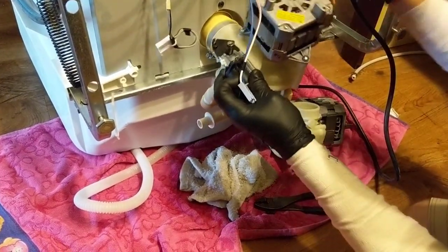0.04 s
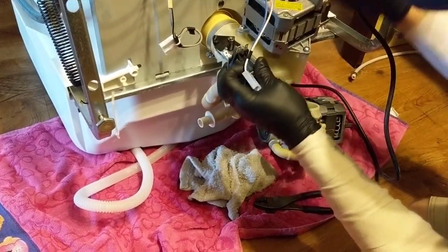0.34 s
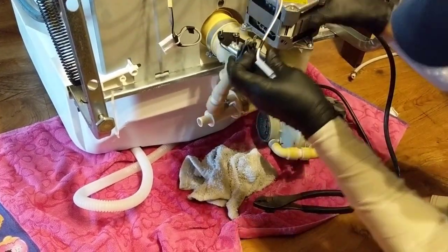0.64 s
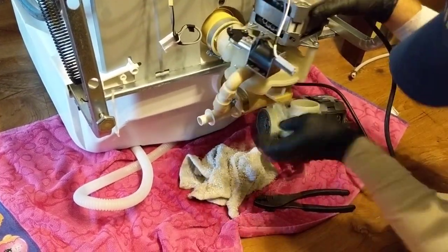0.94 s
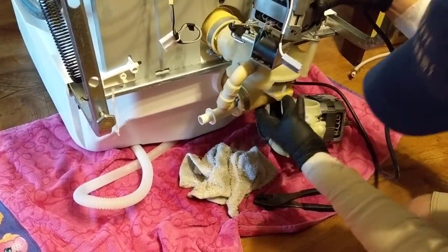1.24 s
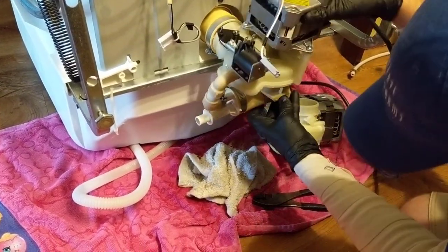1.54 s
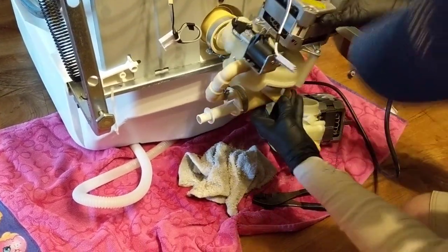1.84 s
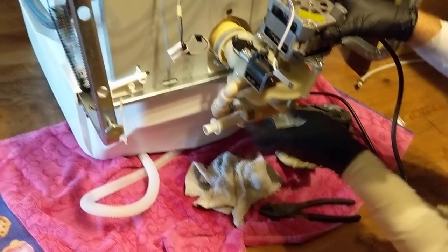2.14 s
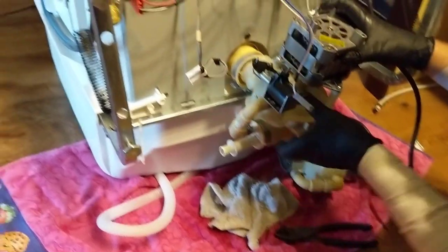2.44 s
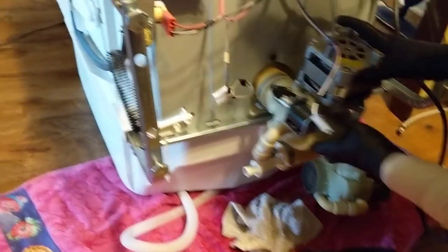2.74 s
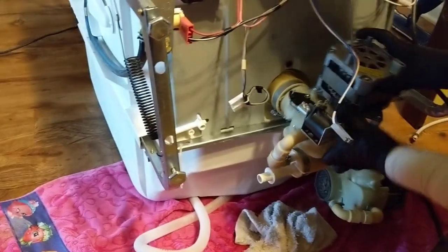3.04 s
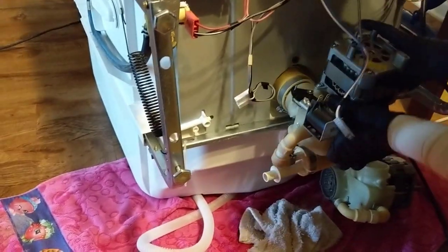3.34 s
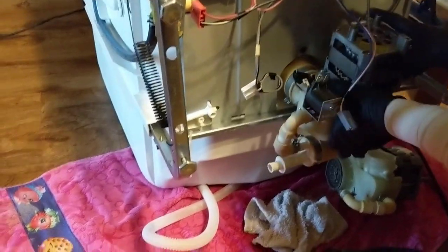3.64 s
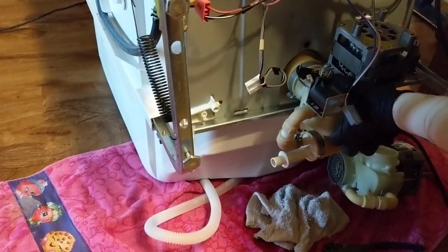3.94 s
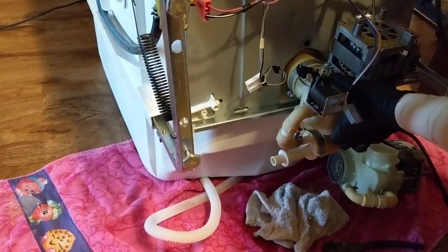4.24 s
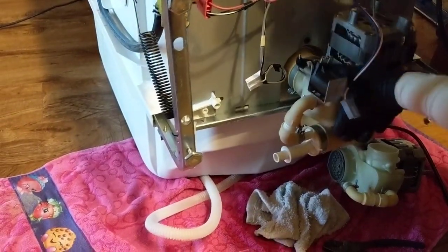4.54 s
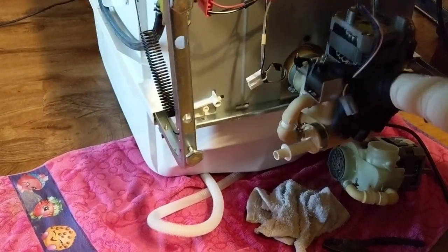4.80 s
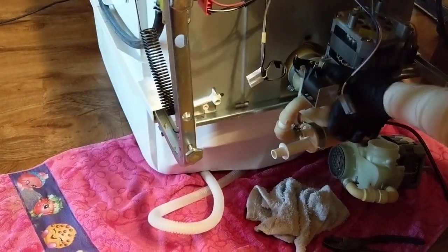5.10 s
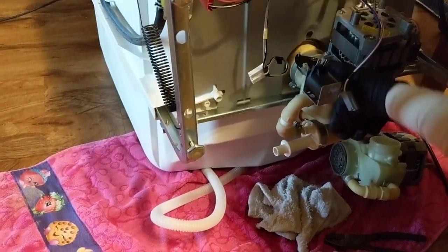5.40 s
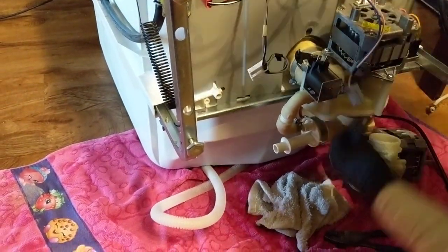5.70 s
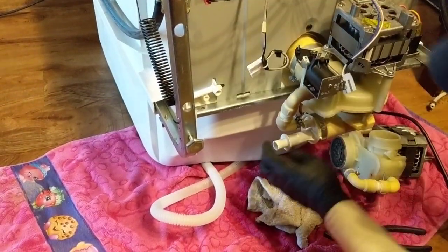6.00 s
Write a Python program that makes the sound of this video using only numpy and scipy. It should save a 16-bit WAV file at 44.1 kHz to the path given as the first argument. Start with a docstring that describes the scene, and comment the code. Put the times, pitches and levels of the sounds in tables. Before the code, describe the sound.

In a small room with a low, steady hum, quick plastic clicks and hollow thumps come from a pump and motor being handled close to the microphone. Gloves and plastic scrape softly. Around the middle the parts bang hard against a steel dishwasher tub, which rings briefly. About a second later they clatter against it twice more, before the handling thins to a few light knocks and clicks.

```python
"""A pump housing knocks in its seat as gloved hands work the pump and motor into a dishwasher's steel tub.
The heavy motor thumps, the hollow housing rings, and plastic fittings click as they meet. Three hard
jolts make the tub ring. Gloves and plastic rub, and a rubber seal groans. Behind it all is the low
mains hum of a small room. One nearby microphone with a limiter picks it up."""
import sys
import numpy as np
from scipy import signal
from scipy.fft import rfft, irfft, next_fast_len
from scipy.io import wavfile
from scipy.ndimage import uniform_filter1d, minimum_filter1d, map_coordinates

SR = 44100
rng = np.random.default_rng(int(sys.argv[2]) if len(sys.argv) > 2 else 0)


def file_out(sig):
    """Save sig as 16-bit WAV at sys.argv[1]."""
    # one column per channel
    cols = np.atleast_2d(sig).T
    # limit, then scale
    lim = np.clip(cols, -1, 1)
    pcm = np.round(lim * 32767).astype(np.int16)
    wavfile.write(sys.argv[1], SR, pcm)


N = 276066

# A fade time (t60) is how long a sound takes to drop by 60 dB. A mode is one note a part rings at.
# The housing bumps its seat:
# (time [s], thump level [dB], knock level [dB], ring length [factor], pitch of the struck spot [Hz])
KNOCKS = [(0.048, -25, -30, 0.85, 603), (0.117, -43, -30, .3, 680), (0.633, -14.5, -19, 0.24, 780),
          (0.708, -12.5, -23.5, 1.08, 497), (0.827, -24.5, -31, 0.82, 616), (1.191, -33, -64, 1.05, 500),
          (1.412, -26, -51, 1.2, 450), (1.432, -17.5, -29, 0.26, 590), (1.729, -7, -21, 0.7, 525),
          (1.800, -47, -30.5, 0.37, 606), (2.617, -34.5, -44, 2.3, 650), (2.815, -40, -42, 1.5, 600),
          (3.0224, -18, -24.5, 0.46, 597), (3.545, -5.5, -10, 0.62, 320), (3.615, -14, -28, 0.9, 398),
          (4.058, -31, -47, 0.39, 450), (4.448, -35, -41, 2, 406), (4.591, -13, -25, 0.35, 456),
          (4.606, -18.5, -15.5, 1.1, 653), (4.630, -18.5, -17.5, 0.67, 590), (4.79, -21, -18, 0.53, 660),
          (4.893, -27.5, -29, 3.3, 710), (5.059, -22.5, -25.5, 0.58, 536), (5.392, -26.5, -25, 0.8, 577)]
# A knock's noisy rattle: (frequency [multiple of the spot's pitch], relative level [dB])
RATTLE_TONE = [(.23, 9), (.6, -4), (1.1, 16), (1.7, -8), (3.4, -7), (9, -26)]
# Fittings meet, and at 3.54 s the first jolt cracks against the tub: (time [s], level [dB], softness [steps, 0
# = ordinary], main pitch [Hz])
CLICKS = [(0.181, -19, -0.11, 7050), (0.196, -28, 1.3, 2090), (0.229, -27, 1.44, 2980),
          (0.2746, -18, 0.088, 4870), (0.463, -35.5, 1.9, 1590), (0.471, -28.5, 0.91, 4960),
          (0.518, -19.5, 0.32, 2720), (0.531, -34, -0.24, 2800), (0.557, -28.5, 0.4, 6470),
          (0.632, -26, -0.7, 6100), (0.704, -32.5, -0.26, 5800), (0.725, -34.5, -0.26, 6050),
          (0.875, -39.5, 1.4, 2340), (0.894, -38.5, 0.015, 7300), (1.0819, -31.5, -1.33, 6780),
          (1.6003, -38.5, -0.96, 7000), (1.735, -34.5, 1, 1935), (2.371, -39.5, 0.042, 4840),
          (2.486, -35, -0.53, 6680), (3.044, -34.5, -2.3, 7200), (3.191, -23.5, -0.65, 7400),
          (3.207, -32.5, 0.0069, 5940), (3.484, -34.5, -0.78, 5600), (3.54, -9.5, -0.32, 3884),
          (3.831, -36.5, -1, 6850), (3.881, -41.5, -.5, 7000), (4.012, -46, 0.22, 8100),
          (4.413, -48, 0.32, 4000), (4.492, -46.5, 1.1, 2680), (4.794, -34, 0.4, 4730),
          (5.254, -45, -0.48, 5600), (5.399, -37, 0.63, 5380), (5.742, -45, .4, 3370),
          (5.807, -44.5, 0.78, 2700), (5.8397, -34, -0.73, 2630), (5.928, -45.5, 0.8, 2700)]
# Jolts against the tub: (time [s], clash level [dB], rise time [s], clash fade time [s],
# ring level [dB], bass boost [dB], treble boost [dB])
JOLTS = [(3.541, -14, 0.0012, 0.057, -20.5, 3, 14), (4.614, -19, 0.00086, 0.35, -29.5, -2, 1.5),
         (4.890, -17, 0.004, 0.32, -31, -2, 1.5)]
# Modes of each part: (frequency [Hz], relative level [dB], base fade time [s])
HOUSING_MODES = [(60.6, -5, 0.23), (101.1, -7, 0.35), (143.8, 0.5, 0.17), (175.5, -0.5, 0.13),
                 (211.2, -13, 0.37), (249, -5.5, 0.16), (301, -6, 0.11), (358.4, 8, 0.071),
                 (444, -3.5, 0.22), (503, -1.5, 0.2), (554, 3, 0.091), (594, 3, 0.14), (652, -21, 0.08),
                 (746, 4.5, 0.089), (820, -3.5, 0.22), (894, -39, 0.031), (1160, -1.5, 0.15)]
PLASTIC_MODES = [(1207, 10, 0.11), (1522, -1.5, 0.075), (2058, -2.5, 0.071), (2690, -13, 0.073),
                 (2987, 4, 0.15), (3377, 4.5, 0.055), (3970, -4, 0.066), (4900, 21, 0.021), (5800, 7, 0.12),
                 (5900, -1, .07), (6740, 5, 0.12), (7550, -10, .05)]
TUB_MODES = [(560, 4, 0.28), (1280, 0, 0.28), (1800, -1, 0.9), (2510, -14, .5), (3400, -13, 0.32),
             (3840, 33, .6), (4200, -16, 0.73), (4054, -7.5, 0.51), (4910, -6, 0.96), (5370, -5, 0.97),
             (5389, -23, 0.82), (5633, -8, 0.61), (6650, -4, 0.39), (6600, 5, 0.49), (7650, -13, 0.3),
             (7100, -9, 0.71)]
# Hands slide the parts along: (start [s], length [s], scrape level [dB], rumble level [dB])
SLIDES = [(0, 0.95, -47, -40.5), (0.39, 0.017, -43, -60), (1.188, 0.13, -53, -46.5),
          (1.493, 0.54, -52.5, -44), (2.13, 0.28, -51, -50.5), (2.477, 0.82, -47.5, -41.5),
          (2.572, 0.01, -40.5, -61), (3.32, .45, -48, -38.5), (4.429, 0.68, -55, -39.5),
          (5.684, 0.41, -54, -53.5)]
# The rubber seal drags: (time [s], level [dB], pitch [Hz])
SEAL_DRAG = [(3.3, -52, 726), (3.35, -47.5, 718), (3.42, -39, 665), (3.46, -48, 518), (3.52, -41, 606)]
# The tone of each noise, from bass to treble: (frequency [Hz], relative level [dB])
CLICK_TONE = [(200, -22), (800, -8), (1400, 2), (3000, 0.5), (5000, 4.5), (7500, 5.5), (9000, -3),
              (15500, -14.5)]
CLASH_TONE = [(50, -41), (120, 1), (330, 1.5), (700, 6.5), (1050, -4.5), (2900, -2), (4000, -6),
              (5600, -2.5), (7500, -7), (9500, -14.5), (15500, -25)]
TUB_RING_TONE = [(45, -22), (100, 15.5), (330, 8.5), (600, 12), (1100, 5), (2800, -2.5), (4200, -0.5),
                 (7500, -10.5), (9500, -22), (15500, -42)]
SCRAPE_TONE = [(470, -42), (800, -5.5), (976, -5.5), (1770, -4.5), (2660, -8), (6590, -9.5), (7840, -9),
               (8980, -18), (15500, -20)]
RUMBLE_TONE = [(25, -30), (60, 0.5), (100, 2), (180, 0), (300, -7), (400, -10.5), (600, -11.5), (800, -19),
               (1100, -20), (2500, -43)]
ROOM_NOISE_TONE = [(25, -31), (60, 2), (80, -43), (115, 7.5), (200, -8.5), (300, -0.5), (400, -14.5),
                   (700, -6.5), (1000, -20), (2500, -19.5), (7500, -40.5), (9500, -31), (15500, -33)]
# The hum's two notes: (frequency [Hz], relative level [dB])
HUM_NOTES = [(118.6, 1), (258.4, -6.5)]
# The hum swells and sinks: (time [s], level [dB])
HUM_LEVEL = [(0, -50.5), (1.2, -48.5), (2.4, -47.5), (3.4, -43.5), (4.0, -52), (4.4, -52), (5.3, -56),
             (5.6, -51), (6.26, -52)]
# The room's echo: (frequency [Hz], fade time [s])
ECHO_FADE = [(100, 0.39), (1000, 0.53), (6000, 0.36), (15000, 0.37)]

SINCE_HIT = np.arange(SR) / SR  # seconds since a blow
NOW = np.arange(N) / SR  # seconds since the scene began
GRID_HZ = np.geomspace(50, 15500, num=160)


def housing_knocks(low_count=7):
    """The heavy motor thumps on the low modes; the hollow housing answers on the higher ones."""
    out = np.zeros(N)
    low_modes, high_modes = HOUSING_MODES[:low_count], HOUSING_MODES[low_count:]
    # Every click also gives the housing a weak knock a moment later.
    nudges = [(start + 0.00796, db - 11.5, db - 20.5, 1.7, 550) for start, db, _, _ in CLICKS]
    for start, thump_db, knock_db, length, spot_hz in KNOCKS + nudges:
        thump = ring(favour(low_modes, spot_hz=245, slope_db=3.5), length) * rise(0.0042)
        hollow = ring(favour(high_modes, spot_hz, slope_db=12), length)
        rattle_tone = [(multiple * spot_hz, db) for multiple, db in RATTLE_TONE]
        rattle = noise(rattle_tone, SR) * fade(0.13 * length)
        knock = (hollow + amp(-3.5) * rattle) * rise(0.00064)
        add(out, start, amp(thump_db) * thump + amp(knock_db) * knock)
    return out


def fitting_clicks(ring_cycles=230):
    """Plastic fittings meet with a crack and ring briefly; a softer contact is duller and longer. The first
    jolt's crack at 3.54 s is made the same way."""
    out = np.zeros(N)
    for start, db, softness, main_hz in CLICKS:
        t60, rise_s = 0.054 * 2.04 ** softness, 0.00046 * 1.7 ** softness
        body_db, treble_db = 4 + 5.5 * softness, 1.5 - 3 * softness
        tilt = [(2200, body_db), (5000, 0), (7500, 0), (11000, treble_db)]
        peak_db = 6 * np.exp(-(np.log2(GRID_HZ / main_hz) / 0.12) ** 2)  # narrow lift at the main pitch
        hiss = noise(spot_tone(CLICK_TONE, tilt, ripple_db=1.5, lift_db=peak_db), SR)
        snap = amp(-1.5) * fade(0.0036)
        tail = amp(3.5) * fade(t60) * chatter(per_second=220, depth_db=1)
        crack = hiss * (snap + tail)
        length = min(t60 / 0.088, 1)  # a harder contact rings shorter
        body = amp(-6.5 + body_db / 2) * ring(favour(PLASTIC_MODES, main_hz, slope_db=6), length)
        main_note = amp(-9) * ring([(main_hz, 0, ring_cycles / main_hz)])
        add(out, start, amp(db) * (crack + body + main_note) * rise(rise_s))
    return out


def tub_jolts():
    """The motor bracket clashes against the tub, whose sheet steel rings on."""
    out = np.zeros(N)
    for start, clash_db, rise_s, t60, ring_db, bass_db, treble_db in JOLTS:
        tilt = [(450, bass_db), (1000, 0), (2800, 0), (5000, treble_db / 2), (12000, treble_db)]
        clash_tone = spot_tone(CLASH_TONE, tilt, ripple_db=3.5)
        ring_tone = spot_tone(TUB_RING_TONE, tilt, ripple_db=1.5)
        clash = noise(clash_tone, SR) * fade(t60)
        wash = noise(ring_tone, SR) * fade(0.84)  # modes so crowded that they blur into noise
        steel = wash + amp(-18) * ring(TUB_MODES)
        add(out, start, (amp(clash_db) * clash + amp(ring_db) * steel) * rise(rise_s))
    return out


def rubbing(slips_per_second=220, attack_s=0.025, release_s=0.046):
    """Gloves and plastic scrape along in tiny slips while the housing rumbles."""
    scrape_power, rumble_power = amp(-56) ** 2, amp(-52.5) ** 2  # gloves that merely hold on
    for start, length, scrape_db, rumble_db in SLIDES:
        speed_up = np.clip(1 + (NOW - start) / attack_s, 0, 1)
        slow_down = np.exp(-np.maximum(NOW - start - length, 0) / release_s)
        speed = speed_up * slow_down
        scrape_power += (amp(scrape_db) * speed) ** 2
        rumble_power += (amp(rumble_db) * speed) ** 2
    slip_kicks = (rng.random(N) < slips_per_second / SR) * rng.uniform(-1, 1, N)
    hiss = rng.standard_normal(N)
    one_slip = rng.standard_normal(SR) * fade(0.015)
    slips = unit(signal.fftconvolve(slip_kicks, one_slip)[:N])
    scrape = colour(hiss + amp(-7) * slips, SCRAPE_TONE) * amp(0.6 * wobble(35))
    rumble = noise(RUMBLE_TONE, N) * amp(1.66 * wobble(25))
    return scrape * np.sqrt(scrape_power) + rumble * np.sqrt(rumble_power)


def seal_groan():
    """The rubber seal drags, making a soft, rough note that slides in pitch."""
    level_db, hz = curves(SEAL_DRAG)
    note = np.sin(2 * np.pi * np.cumsum(hz) / SR)
    dragging = (NOW > SEAL_DRAG[0][0]) & (NOW < SEAL_DRAG[-1][0])
    return unit(wobble(300) * note) * amp(level_db) * dragging


def mains_hum():
    """A low electrical hum whose two notes waver a little."""
    level_db, = curves(HUM_LEVEL)
    out = np.zeros(N)
    for hz, db in HUM_NOTES:
        gain = amp(db + level_db + 1.6 * wobble(12))
        phase = 2 * np.pi * hz * NOW + 0.5 * wobble(9)
        out += gain * np.sqrt(2) * np.sin(phase)
    return out


def room_noise():
    """The soft, steady rush of the room."""
    return amp(-53.5) * noise(ROOM_NOISE_TONE, N)


def room_echo(sound):
    """The walls send back a smooth wash of echoes that lasts longest in the middle pitches."""
    hz, seconds, spectrum = signal.stft(rng.standard_normal(SR // 2), SR, nperseg=256)
    decay = np.exp(-np.log(1000) * seconds / along(ECHO_FADE, hz)[:, None])
    _, tail = signal.istft(spectrum * decay, SR, nperseg=256)
    tail = np.pad(tail / np.linalg.norm(tail), (SR // 200, 0))  # arrives 5 ms late
    return signal.fftconvolve(sound, tail)[:N]


def amp(db):
    """Turn decibels into a gain."""
    return 10 ** (np.asarray(db) / 20)


def unit(sound):
    """Scale to an average strength (rms) of 1."""
    return sound / np.sqrt(np.mean(sound ** 2) + 1e-20)


def along(points, hz):
    """Read between (frequency, value) points, spaced by musical pitch."""
    point_hz, values = np.transpose(points)
    return np.interp(np.log(hz + 1), np.log(point_hz + 1), values)


def curves(rows):
    """One value per sample for each column after the time."""
    times, *columns = np.transpose(rows)
    return [np.interp(NOW, times, column) for column in columns]


def wobble(per_second):
    """A smooth curve through this many random values a second."""
    return map_coordinates(rng.standard_normal(int(N * per_second / SR) + 4), [NOW * per_second])


def chatter(per_second, depth_db):
    """The uneven force of a bouncing contact."""
    bounces = np.interp(SINCE_HIT * per_second, np.arange(1000), rng.standard_normal(1000))
    return unit(amp(-depth_db * bounces))


def colour(sound, tone):
    """Give a sound this tone, at strength 1."""
    size = next_fast_len(len(sound) + 4096)
    gains = amp(along(tone, np.fft.rfftfreq(size, 1 / SR)))
    return unit(irfft(rfft(sound, size) * gains, size)[:len(sound)])


def noise(tone, size):
    """Noise with this tone, at strength 1."""
    return colour(rng.standard_normal(size), tone)


def spot_tone(tone, tilt, ripple_db, lift_db=0):
    """Tilt a tone and add the random peaks and dips of one struck spot."""
    ripple = ripple_db * rng.standard_normal(len(GRID_HZ))
    return np.column_stack([GRID_HZ, along(tone, GRID_HZ) + along(tilt, GRID_HZ) + ripple + lift_db])


def rise(seconds):
    """A blow builds up as the contact closes."""
    return 1 - np.exp(-SINCE_HIT / seconds)


def fade(t60):
    """A sound dies away after a blow."""
    return np.exp(-np.log(1000) * SINCE_HIT / max(t60, 0.003))


def ring(modes, length=1):
    """A struck part rings in fading notes, with new strengths and signs at each blow."""
    mode_hz, db, fade_times = np.transpose(modes)
    gains = amp(db + 2 * rng.standard_normal(len(db)))
    gains *= np.sign(rng.standard_normal(len(db)))
    waves = [np.sin(2 * np.pi * hz * SINCE_HIT) * fade(t60 * length)
             for hz, t60 in zip(mode_hz, fade_times)]
    return np.dot(gains, waves) / np.sqrt(np.sum(gains ** 2) / 2)


def favour(modes, spot_hz, slope_db):
    """The struck spot drives the modes near spot_hz hardest: slope_db less per octave away."""
    return [(hz, db - slope_db * abs(np.log2(hz / spot_hz)), t60) for hz, db, t60 in modes]


def add(track, start, sound):
    """Mix a sound in, start seconds into the track."""
    part = track[round(start * SR):][:len(sound)]
    part += sound[:len(part)]


def scene():
    """Everything reaches one microphone; the knocks, clicks and jolts also echo in the room."""
    clicks, knocks, jolts = fitting_clicks(), housing_knocks(), tub_jolts()
    echo = room_echo(amp(-8) * knocks + amp(-8.5) * clicks + amp(-15) * jolts)
    mono = knocks + clicks + jolts + echo + rubbing() + seal_groan() + mains_hum() + room_noise()
    return np.array([mono, mono])


def limiter(sound, ceiling_db):
    """Turn the level down smoothly for about a millisecond around each loud peak."""
    peak = np.abs(sound).max(axis=0) / amp(ceiling_db)
    gain = (1 + peak ** 4) ** -0.25
    return sound * uniform_filter1d(minimum_filter1d(gain, size=33), size=33)


def record(dry):
    """The recorder limits the peaks and cuts off the highest treble."""
    limited = limiter(dry, ceiling_db=-6)
    size = next_fast_len(N + SR // 2)
    hz = np.fft.rfftfreq(size, 1 / SR)
    return irfft(rfft(limited, size) * (hz < 15900), size)[:, :N]


dry = scene()
out = record(dry)
file_out(out)
```